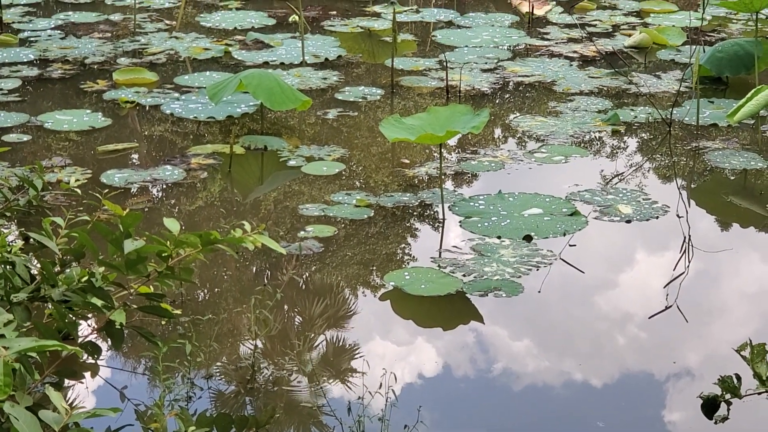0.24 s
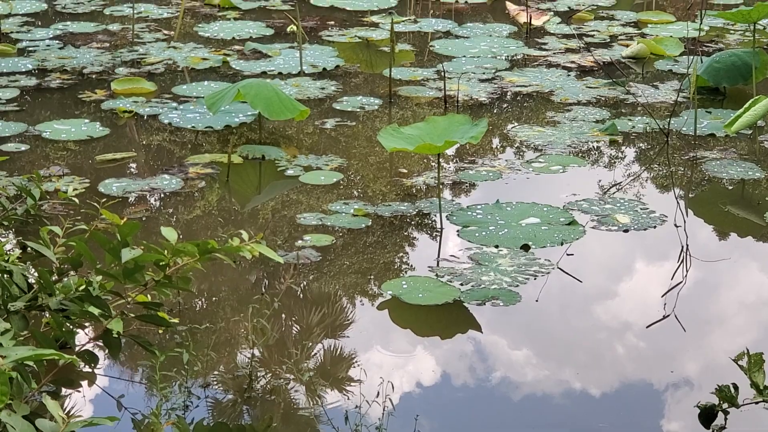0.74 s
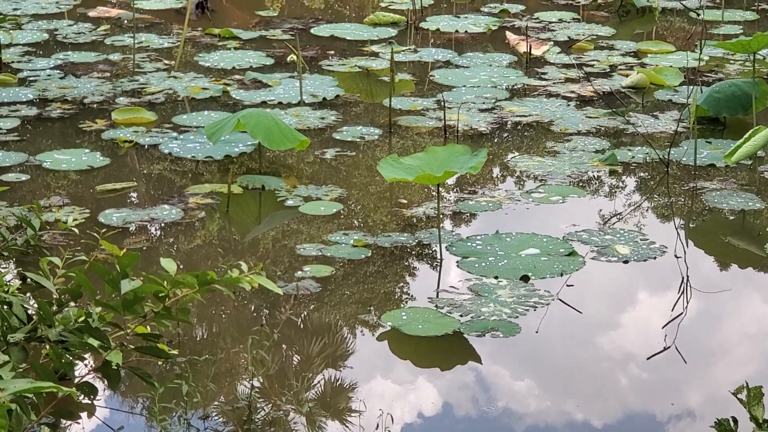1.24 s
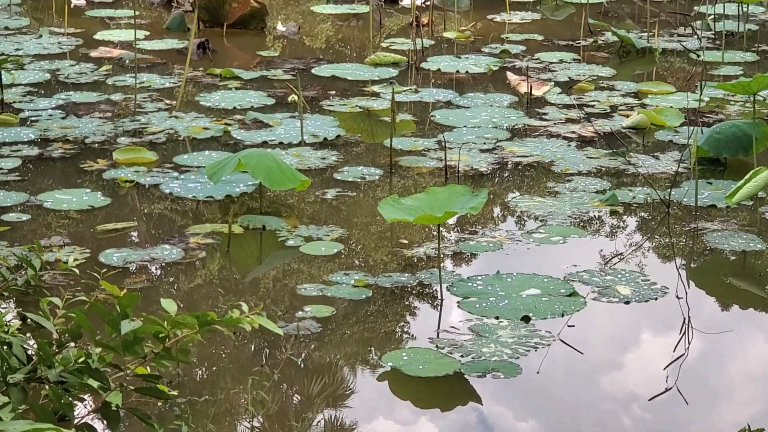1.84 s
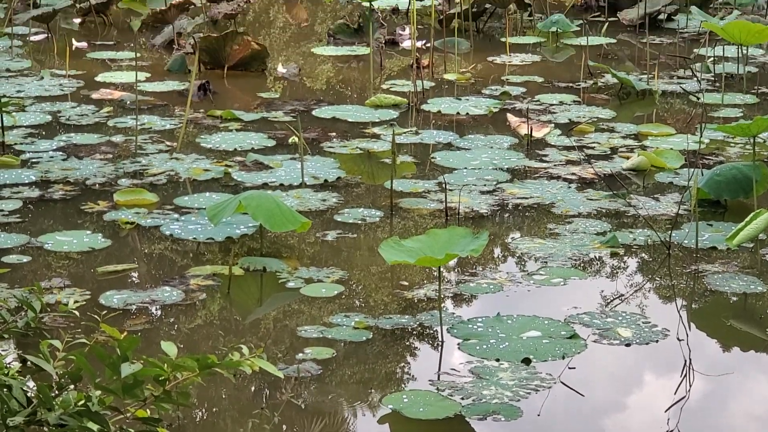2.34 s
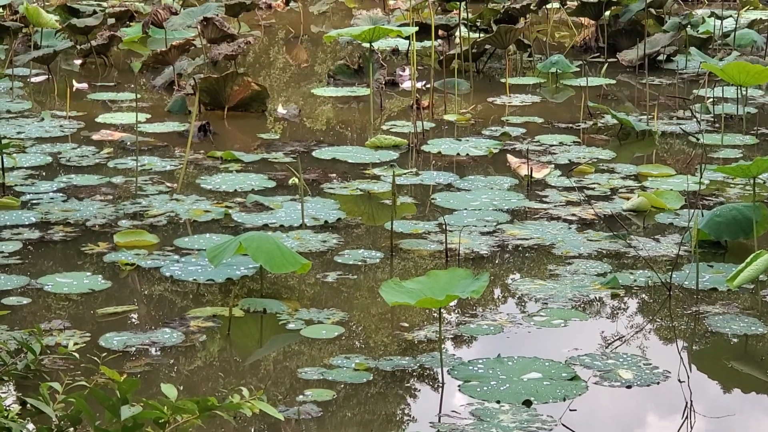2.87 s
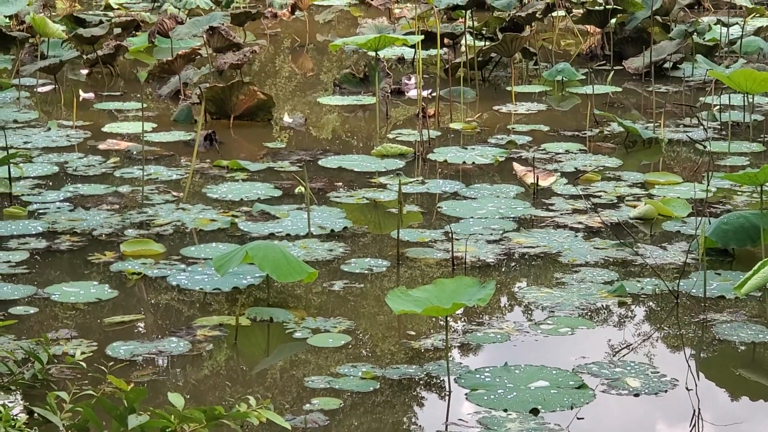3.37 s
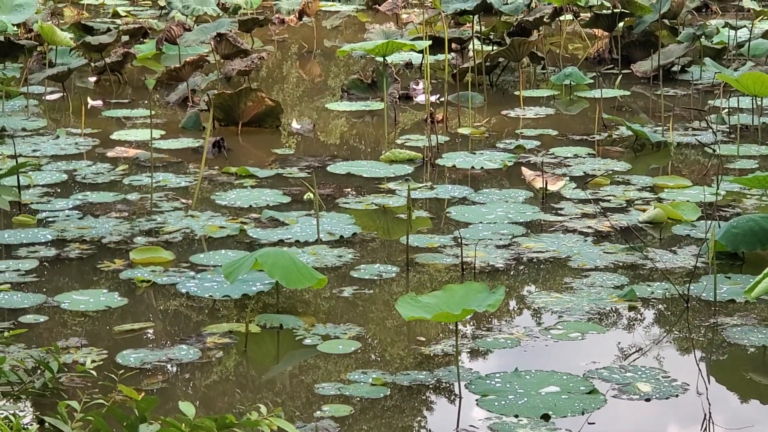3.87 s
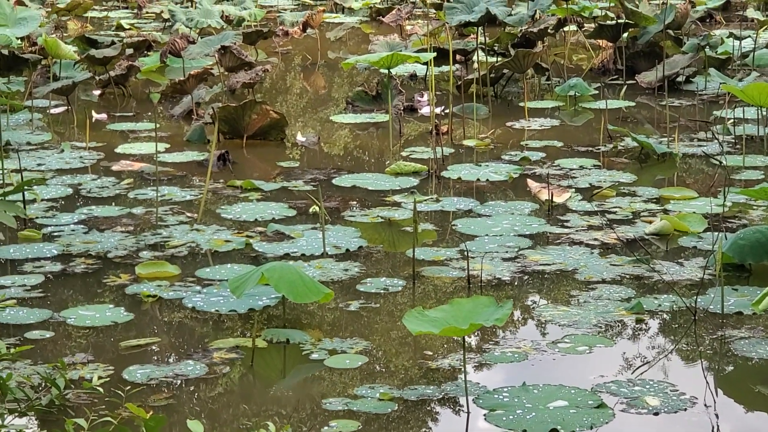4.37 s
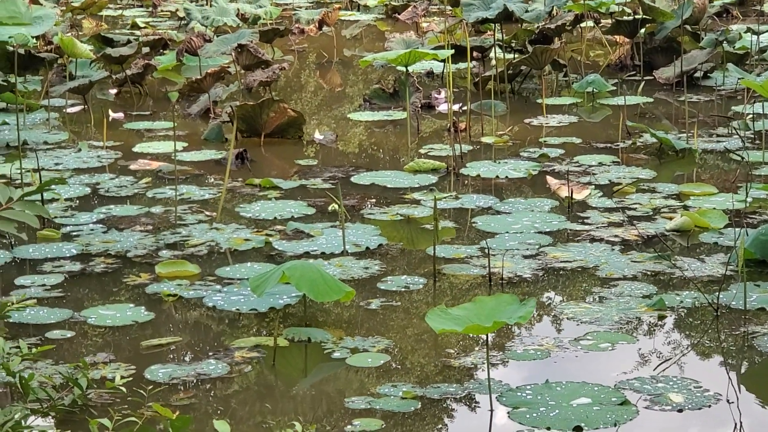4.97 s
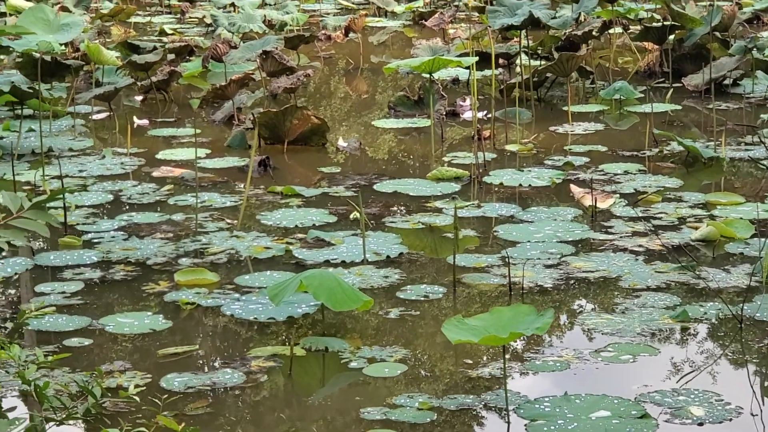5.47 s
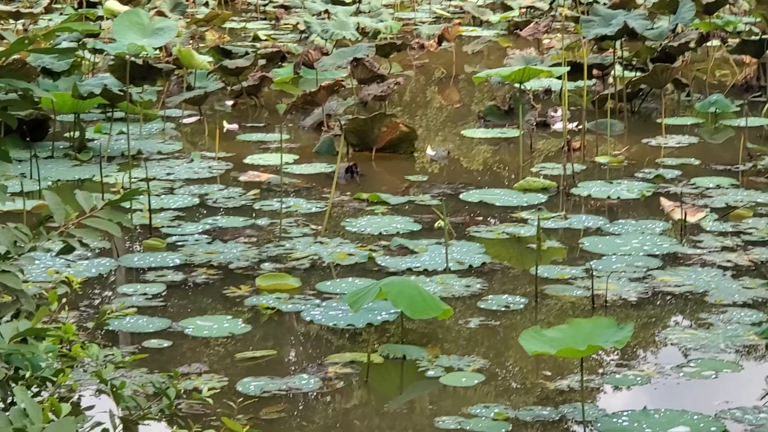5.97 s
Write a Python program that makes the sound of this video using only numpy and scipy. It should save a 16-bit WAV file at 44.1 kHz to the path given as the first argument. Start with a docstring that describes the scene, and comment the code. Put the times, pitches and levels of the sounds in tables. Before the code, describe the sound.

Beside a pond, a cricket stutters at a high pitch on the left while katydids buzz in short repeated phrases. Under them, traffic rumbles and a distant engine picks up speed, then eases off about halfway. Clothes swish softly and fingers tap and click on the hand-held microphone. Later a far bird gives two faint, hoarse calls, and a sharp knock lands on the left near the end.

```python
"""At the edge of a lotus pond, insects sing by scraping their wings: a stuttering cricket close on
the left, buzzing katydids and fainter crickets beyond. Over the rumble of far roads, a distant engine
pulls up to speed and then eases off. Clothes rustle, and fingers knock and click on the hand-held
microphone. A far bird calls twice across the water, and one thin, high chirp comes near the end."""
import sys
import numpy as np
from scipy import signal
from scipy.fft import irfft
from scipy.io import wavfile
from scipy.ndimage import uniform_filter1d

SR = 44100
rng = np.random.default_rng(int(sys.argv[2]) if len(sys.argv) > 2 else 0)


def log_audio(samples):
    """Write samples as a 16-bit WAV file to the path given in sys.argv[1]."""
    # one column per channel
    frames = np.atleast_2d(samples).T
    # limit to full scale, then quantise
    limited = np.clip(frames, -1, 1)
    pcm = np.round(limited * 32767).astype(np.int16)
    wavfile.write(sys.argv[1], SR, pcm)


N = 274302
T = np.arange(N) / SR
PASS_S, THROTTLE_OFF_S = 2, 3.27  # when the vehicle goes by; when its driver stops accelerating


def undb(db):
    """Turn decibels (dB) into a number to multiply a sound by."""
    return 10 ** (np.asarray(db) / 20)


def unit(x):
    """Scale a sound so that its average power is 1."""
    return x / np.sqrt(np.mean(x ** 2) + 1e-20)


def ramp(start, length):
    """0 before start, rising to 1 over length seconds."""
    return np.clip((T - start) / length, 0, 1)


def since(start):
    """Seconds gone since start, 0 before it."""
    return np.maximum(T - start, 0)


def pan(db):
    """Left and right gains that make the left side db decibels louder."""
    return unit(undb(np.array([[db], [-db]]) / 2))


def wander(rate):
    """A random drift, about 1 in size, that heads for a new value rate times a second."""
    points = rng.standard_normal(4096)
    return 1.2 * np.interp(T * rate, np.arange(len(points)), points)


def sine(hz):
    """A tone that follows a pitch curve."""
    return np.sin(2 * np.pi * np.cumsum(hz) / SR)


def add(track, start, sound):
    """Mix a short sound into a track, start seconds in."""
    i = int(np.clip(start * SR, 0, N))
    track[i:i + len(sound)] += sound[:N - i]


def noise(spectrum, tilt_db=0):
    """Noise shaped by rows of frequency and level, made brighter by tilt_db for each octave up."""
    hz, db = np.transpose(spectrum)
    octave = np.log2(np.maximum(np.arange(N // 2 + 1) * SR / N, 1))
    inside = np.clip(octave, np.log2(hz[0]), np.log2(hz[-1]))
    edge_db = -24 * abs(octave - inside)  # dies away beyond the first and last rows
    gain = undb(np.interp(octave, np.log2(hz), db) + tilt_db * inside + edge_db)
    white = rng.standard_normal(len(gain)) + 1j * rng.standard_normal(len(gain))
    return unit(irfft(gain * white, N))


def wide_noise(spectrum, alike_hz, tilt_db=0):
    """Noise from all round: long waves, below alike_hz, reach left and right alike; short ones do not."""
    keep_highs = signal.butter(1, alike_hz, "high", fs=SR, output="sos")
    side = signal.sosfilt(keep_highs, noise(spectrum, tilt_db))
    return unit(noise(spectrum, tilt_db) + side * np.array([[1], [-1]]))


def scatter(x, echo_s, echo_db, pan_db):
    """A sound from one side plus its echo off leaves and banks, scaled together to a power of 1."""
    tail = rng.standard_normal((2, SR)) * np.exp(-np.log(1000) * T[:SR] / echo_s)  # 60 dB down at echo_s
    tail /= np.sqrt(np.sum(tail ** 2, axis=1, keepdims=True))
    echo = signal.fftconvolve(x[None], tail, axes=1)[:, :N]
    return unit(x * pan(pan_db) + undb(echo_db) * echo)


def wing_stutter(runs, low_hz, high_hz, stroke_s, period_s, rest_s):
    """Wing strokes in twos and threes; each speeds up along a row of teeth, rising to a steady pitch."""
    out, progress = np.zeros(N), np.linspace(0, 1, int(stroke_s * SR))
    chance = iter(rng.standard_normal((2000, 4)))
    glide_hz = high_hz + (low_hz - high_hz) * np.exp(-(progress / 0.34) ** 2)
    swell = np.sin(np.pi * progress) ** 2
    for now, end in runs:
        strokes_left = 3
        while now < end:
            late, loud, sharp, group = next(chance)
            add(out, now, undb(.9 * loud) * swell * sine(glide_hz * (1 + .004 * sharp)))
            now += period_s + 0.00034 * late
            strokes_left -= 1
            if strokes_left == 0:
                now += rest_s * (2 if group > 1.1 else 1)
                strokes_left = 2 if group < -.6 else 3
    return unit(out)


def crickets():
    """One cricket scrapes its wings close on the left, and another sings further off."""
    # The near cricket's stumbles. Each entry: the time in seconds when a tiny break begins.
    stumbles = [1.646, 4.927, 5.072, 5.585, 5.72, 5.86, 6.005, 6.156]
    runs = zip([0] + [start + 0.021 for start in stumbles], stumbles + [T[-1]])
    near = wing_stutter(runs, low_hz=6240, high_hz=7147, stroke_s=0.0105, period_s=.012, rest_s=0.0058)
    far = wing_stutter([(0, T[-1])], low_hz=6656, high_hz=7377,
                       stroke_s=0.0096, period_s=0.0085, rest_s=0.0076)
    near_db = -54 + 0.3549 * T - 15.5 * since(5.45)  # grows slowly, then fades near the end
    near = scatter(near, echo_s=.035, echo_db=-13, pan_db=18) * undb(near_db)
    far = scatter(far, echo_s=0.11, echo_db=0.5, pan_db=13) * undb(-63.5 + 3 * wander(7.2))
    return near + far


def wing_buzz(rate_hz, pitch_hz, sweep, jitter_hz, sharpness):
    """Fast, even wing strokes; each makes the wing ring with a short, unsteady slide in pitch."""
    progress = np.cumsum(rate_hz * (1 + 0.011 * wander(12))) / SR % 1  # 0 to 1 in each stroke
    teeth = unit(uniform_filter1d(rng.standard_normal(N), size=30))
    tone = sine(pitch_hz * (1 + sweep * (progress - .5)) + jitter_hz * teeth)
    return unit(tone * np.sin(np.pi * progress) ** sharpness * undb(0.72 * wander(150)))


def katydids():
    """A katydid buzzes its wings in phrases; a fainter, higher one keeps going and swells in answer."""
    # The near katydid's phrases. Each entry: start in seconds.
    phrase_starts = [-.25, .385, 1.0, 1.6, 2.23, 2.88, 3.515, 4.177, 4.878, 5.454, 6.047]
    longest_phrase_s, shortest_pause_s = 0.57, 0.08
    effort, answer = np.zeros(N), np.zeros(N)
    for start, following in zip(phrase_starts, phrase_starts[1:] + [np.inf]):
        end = min(start + longest_phrase_s, following - shortest_pause_s)
        singing = ramp(start, 0.0043) * (1 - ramp(end, 0.0045))
        effort += singing * undb(-5.9 * np.exp(-since(start) / 0.084))  # each phrase starts softly
        answer += ramp(start + .05, 0.34) * (1 - ramp(end, 0.18))
    surge_db = 3.5 * np.exp(-((T - 5.97) / 0.25) ** 2)  # it pushes harder near the end
    song = wing_buzz(rate_hz=156, pitch_hz=11120, sweep=-.12, jitter_hz=200, sharpness=1.6)
    song *= effort * undb(-62 + 0.47 * T + surge_db)
    neighbour = wing_buzz(rate_hz=180, pitch_hz=11640, sweep=-0.047, jitter_hz=415.5, sharpness=0.94)
    near = scatter(song, echo_s=0.036, echo_db=2.5, pan_db=-2) * np.std(song)
    neighbour_gain = np.hypot(undb(-69), undb(-70) * answer) * undb(3.5 * wander(2.3))
    return near + scatter(neighbour, echo_s=0.044, echo_db=19.5, pan_db=4) * neighbour_gain


def trill():
    """A thin trill of very fast wing strokes that swells and drops about once a second."""
    first_peak_s, drop_s, cycle_s = 0.45, 0.1, .922
    dip_db = np.interp((T - first_peak_s) % cycle_s, [0, drop_s, cycle_s], [0, -13, 0])
    db = -59.5 + dip_db - 1.5 * abs(T - 3)  # strongest around 3 seconds in
    song = wing_buzz(rate_hz=270, pitch_hz=7920, sweep=-0.028, jitter_hz=279, sharpness=5.2)
    return scatter(song, echo_s=0.1, echo_db=-1, pan_db=25) * undb(db)


def engine():
    """Exhaust tones, wavering on their long way through the air, with a little clatter of moving parts."""
    # How loud the exhaust booms. Each row: time in seconds, level in dB.
    boom_levels = [(0, -59), (.3, -52.5), (.55, -41.5), (1.05, -51.5), (1.4, -41), (1.85, -43.5),
                   (2.15, -35.5), (2.5, -42.5), (3.25, -45)]
    # The tones of the boom. Each row: multiple of the engine's firing rate, relative level in dB.
    boom_tones = [(.5, -9), (1, 5), (1.5, -23)]
    # The higher exhaust tones. Each row: multiple of the firing rate, relative level in dB.
    high_tones = [(2.5, 3.5), (3, -1.5), (3.5, -10.5), (4, -8.5)]
    # The noise of the moving parts. Each row: frequency in Hz, relative level in dB.
    clatter_spectrum = [(300, 6.5), (700, -3.5), (1200, -9.5), (1800, -2), (2300, -1.5), (2900, -14),
                        (5000, -16.5)]
    start_hz, cruise_hz, idle_hz = 72.1, 86.38, 60  # firings a second
    pulling_hz = cruise_hz + (start_hz - cruise_hz) * np.exp(-(T / .76) ** 1.277)
    coasting_s = since(THROTTLE_OFF_S)
    firing_hz = idle_hz + (pulling_hz - idle_hz) * np.exp(-coasting_s / .3)
    phase = 2 * np.pi * np.cumsum(firing_hz * (1 + 0.0029 * wander(22))) / SR
    effort = 1 - ramp(1.49, 0.89)  # eases once the vehicle is up to speed
    fade_db = 26 * coasting_s
    flare_db = 10 * ramp(THROTTLE_OFF_S, 0.13)  # one tone flares as the throttle shuts
    boom_db = np.interp(T, *np.transpose(boom_levels)) - 53 * coasting_s
    octave_db = -64 + 12.5 * effort + flare_db - fade_db
    high_db = -63 + 6 * effort - fade_db
    clatter_db = -65.5 - 3 * abs(T - PASS_S) - fade_db
    out = wide_noise(clatter_spectrum, alike_hz=880) * undb(clatter_db) * (1 + 0.24 * np.sin(phase))
    for tones, db in ((boom_tones, boom_db), ([(2, 0)], octave_db), (high_tones, high_db)):
        hum = sum(undb(tone_db + 2 * wander(8.3)) * np.sin(multiple * phase + rng.uniform(0, 2 * np.pi))
                  for multiple, tone_db in tones)
        out += undb(db) * unit(hum)
    return out


def far_roads():
    """Traffic rumbles and tyre noise swells as the vehicle goes by, under a faint high hiss."""
    # The low rumble of traffic. Each row: frequency in Hz, relative level in dB.
    rumble_spectrum = [(22, -30), (31, -23), (40, -5), (60, 1.5), (80, 3.5), (110, -2.5), (150, -11),
                       (220, -20.5), (330, -28)]
    # Tyres rolling on the road. Each row: frequency in Hz, relative level in dB.
    tyre_spectrum = [(150, -6), (300, -4.5), (450, -3), (650, -1), (1000, -4.5), (1500, -14), (2200, -19.5),
                     (3000, -29), (5000, -38)]
    # The high hiss. Each row: frequency in Hz, relative level in dB.
    hiss_spectrum = [(2500, -17), (5000, -12), (9500, -7.5), (13000, -8.5), (15000, 2.5), (16000, -19.5)]
    rumble_db = -48.5 + 2.5 * (1 - ramp(PASS_S, THROTTLE_OFF_S - PASS_S))
    tyre_db = -62 + 4 * np.exp(-((T - PASS_S) / 0.72) ** 2)
    rumble = wide_noise(rumble_spectrum, alike_hz=332) * undb(rumble_db + 1.2 * wander(11))
    tyres = wide_noise(tyre_spectrum, alike_hz=625) * undb(tyre_db + 0.9 * wander(8)) * pan(2.05)
    hiss = wide_noise(hiss_spectrum, alike_hz=1510) * undb(-71.5) * pan(4.7)
    return rumble + tyres + hiss


def rustles():
    """Cloth slides in short swishes, catching and slipping every few milliseconds."""
    # The swishes. Each row: middle in seconds, half length in seconds, level in dB, brightness (0 to 1).
    swishes = [(0.598, 0.019, -57.5, 0.56), (0.755, 0.026, -53.5, 0.1), (1.27, 0.036, -70.5, 0),
               (1.598, 0.027, -53.5, 0.01), (2.319, 0.053, -54, 0.2), (2.945, 0.049, -62, 0.93),
               (3.258, 0.021, -55.5, 0.73), (4.988, 0.055, -61, 0.98), (5.212, 0.094, -59, 0.58),
               (5.682, 0.019, -64.5, 1), (6.08, 0.16, -62.5, 0.88)]
    # The noise of rubbing cloth. Each row: frequency in Hz, relative level in dB.
    cloth_spectrum = [(300, -4), (1000, -3.5), (1600, 1), (2200, 3), (2900, 2), (3900, 0.5), (5500, -7.5),
                      (9000, -17), (15000, -17.5)]
    dull = wide_noise(cloth_spectrum, alike_hz=1820, tilt_db=-3)
    bright = wide_noise(cloth_spectrum, alike_hz=2980, tilt_db=8.5)
    catching = unit(undb(2.6 * wander(300)))
    out = np.zeros((2, N))
    for middle, half_s, db, brightness in swishes:
        swell = undb(db) / np.cosh(np.clip((T - middle) / half_s, -20, 20))
        out += swell * (np.sqrt(1 - brightness) * dull + np.sqrt(brightness) * bright)
    return out * catching


def knocks():
    """A finger meets the microphone's case: a short ring and a soft, low thud."""
    # The finger taps. Each row: start in seconds, level in dB, ring pitch in Hz, seconds for the ring
    # to fall 60 dB, thud level against the ring in dB, left minus right in dB.
    taps = [(0.7366, -30.5, 1980, 0.0053, -13, 4), (4.676, -39, 380, 0.0075, -3.5, 30),
            (4.823, -44.5, 622, .015, 0.5, 21), (4.912, -37.5, 670, 0.011, 8.5, 21),
            (5.916, -41.5, 706, 0.011, -12, 19), (5.954, -21, 653, 0.013, -24, 35)]
    out, t = np.zeros((2, N)), T[:SR // 8]
    thud = np.sin(2 * np.pi * 98 * t) * np.exp(-((t - .014) / 0.0097) ** 2)
    for start, db, hz, ring_s, thud_db, pan_db in taps:
        ring = np.sin(2 * np.pi * hz * t) * np.exp(-np.log(1000) * t / ring_s)
        for track, gain in zip(out, pan(pan_db)):
            add(track, start, gain * undb(db) * (undb(thud_db) * thud - ring))
    return out


def clicks():
    """Fingers click on the microphone: tiny bright cracks, over in a fraction of a millisecond."""
    # The cracks. Each row: start in seconds, peak level in dB, pitch in Hz, left minus right in dB.
    cracks = [(2.883, -35.5, 12000, -1), (2.921, -36, 12500, -1), (2.938, -26, 12500, -13),
              (3.066, -30.5, 12990, -10), (5.9154, -29.5, 13140, 25), (5.9351, -28, 13000, 8),
              (5.944, -29, 12500, 7), (5.954, -19, 11200, 32)]
    out, t = np.zeros((2, N)), T[:SR // 100]
    for start, db, hz, pan_db in cracks:
        crack = np.cos(2 * np.pi * hz * t) * np.exp(-t / .00009)
        for track, gain in zip(out, pan(pan_db)):
            add(track, start, gain * undb(db) * crack)
    return out


def bird():
    """Two hoarse calls scoop up to pitch, then sink and fade, blurred by the trees round the pond."""
    # The calls. Each row: start in seconds, length in seconds, top pitch in Hz,
    # fall in Hz per second, level in dB.
    calls = [(3.745, 0.73, 594.2, 146.5, -56), (5.318, 0.33, 595.3, 41.4, -55.5)]
    # The tones in the bird's voice. Each row: multiple of the pitch, relative level in dB.
    voice_tones = [(1, 7.5), (2, 6.5), (3, -9.5), (4, -11)]
    rise_s, scoop_hz, fade_db = 0.0511, 50, 13.5
    voice = np.zeros(N)
    for start, length, top_hz, fall, db in calls:
        rise, progress = ramp(start, rise_s), ramp(start, length)
        hz = top_hz - scoop_hz * (1 - rise) - fall * np.minimum(since(start + rise_s), length)
        hz *= 1 + .018 * wander(24) + .022 * wander(260)  # a shaky pitch sounds hoarse
        call_db = db - fade_db * progress + 2 * wander(60) + 2 * wander(18)
        tone = unit(sum(undb(tone_db) * sine(multiple * hz) for multiple, tone_db in voice_tones))
        voice += rise * (progress < 1) * undb(call_db) * tone
    return scatter(voice, echo_s=1.0, echo_db=6, pan_db=5.5) * np.std(voice)


def chirp():
    """One faint, very high chirp that slides down."""
    start_s, length_s, from_hz, to_hz = 5.665, .13, 15300, 12500
    hz = to_hz + (from_hz - to_hz) * np.exp(-since(start_s) / .06)
    loudness = ramp(start_s, .01) * (1 - ramp(start_s, length_s))
    return undb(-68) * loudness * sine(hz * (1 + .004 * wander(400)))


def scene():
    """All the sounds meet at the microphone."""
    insects = crickets() + katydids() + trill()
    return insects + engine() + far_roads() + rustles() + knocks() + clicks() + bird() + chirp()


def record(dry):
    """The recorder cuts off the highest treble."""
    top_hz = 15800
    return signal.sosfilt(signal.ellip(10, .2, 70, top_hz, fs=SR, output="sos"), dry)


dry = scene()
out = record(dry)
log_audio(out)
```